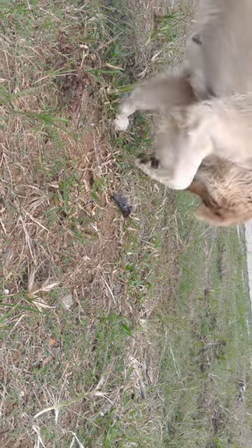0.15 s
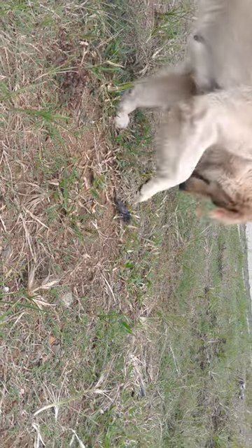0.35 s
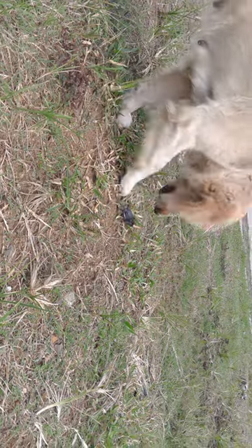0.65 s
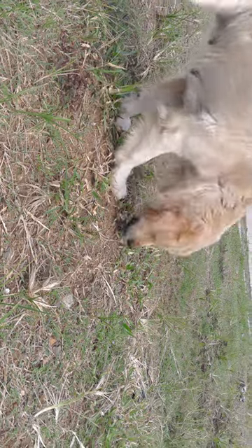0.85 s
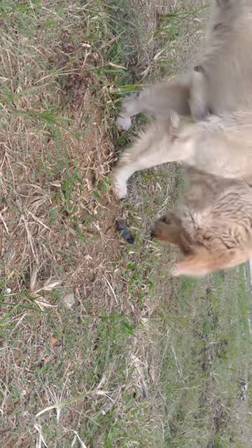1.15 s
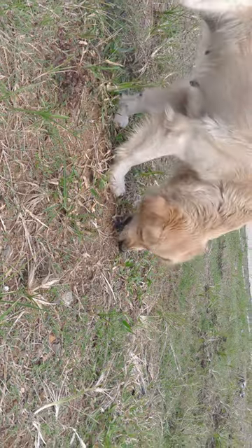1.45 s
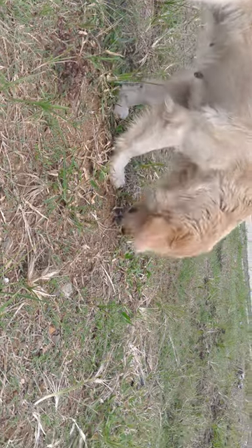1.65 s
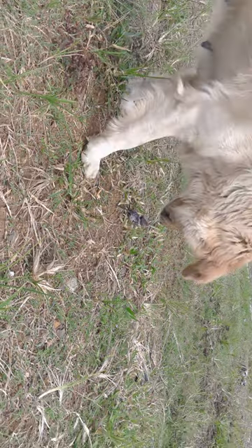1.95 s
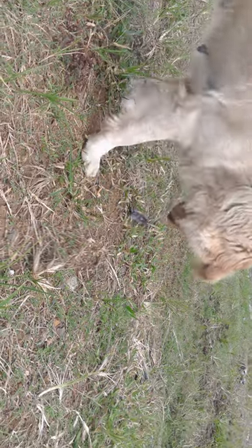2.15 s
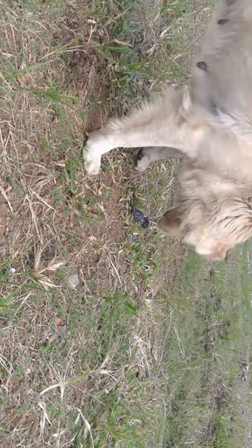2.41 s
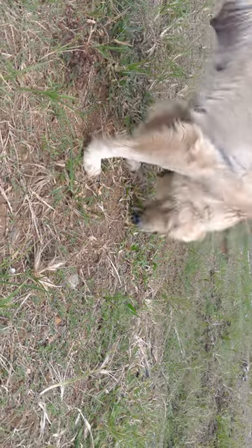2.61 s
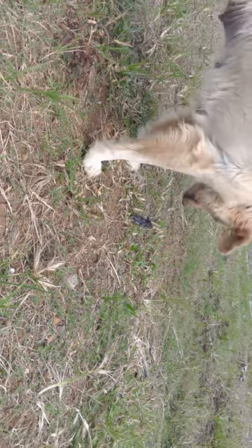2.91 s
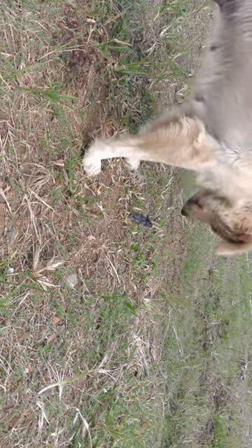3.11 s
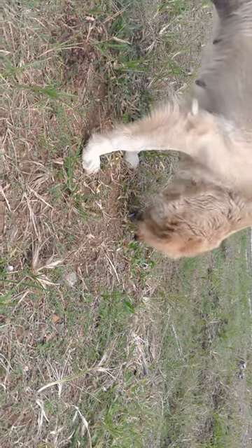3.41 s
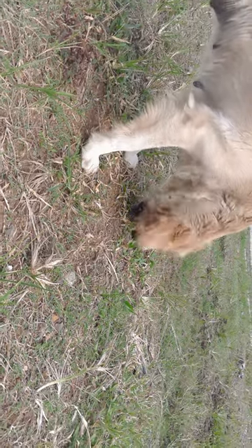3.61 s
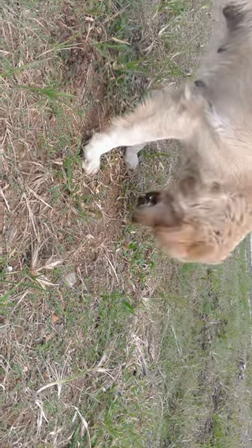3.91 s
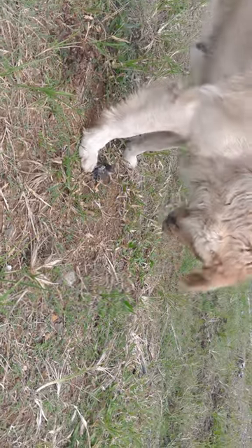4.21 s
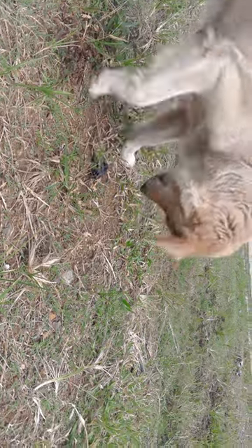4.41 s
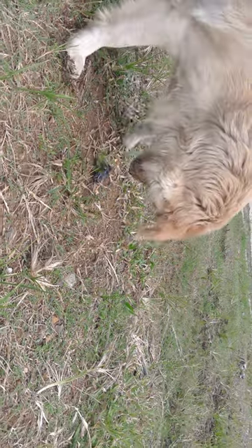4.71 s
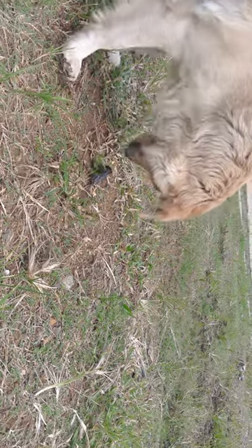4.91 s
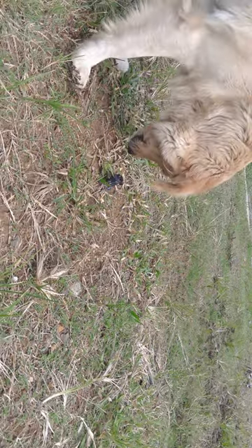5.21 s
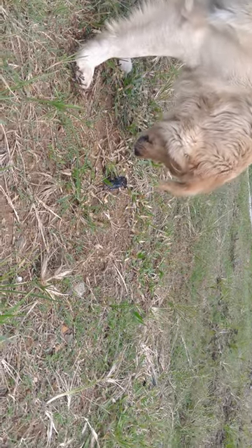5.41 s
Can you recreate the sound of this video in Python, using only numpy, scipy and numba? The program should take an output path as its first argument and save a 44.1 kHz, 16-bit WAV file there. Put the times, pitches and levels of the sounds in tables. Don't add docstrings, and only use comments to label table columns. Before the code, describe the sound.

Outdoors, a small animal gives short high squeaks amid rustling dry grass, four hard cracks early on, and faint wind rumble.

```python
import sys
import numpy as np
from scipy import signal
from scipy.fft import rfft, irfft
from scipy.io import wavfile
from scipy.ndimage import uniform_filter1d
from numba import njit

SR = 44100
rng = np.random.default_rng(int(sys.argv[2]) if len(sys.argv) > 2 else 0)


def to_linear_factor(level_db):
    exponent = np.asarray(level_db, float) / 20
    return 10 ** exponent


def to_wav(s):
    ch = np.atleast_2d(s).T
    pcm = np.round(np.clip(ch, -1, 1) * 32767)
    wavfile.write(sys.argv[1], SR, pcm.astype(np.int16))


N = 244749
T = np.arange(N) / SR


def level(x, db):
    return x * to_linear_factor(db) / np.sqrt(np.mean(x ** 2))


def colour(points, lo=0, hi=SR):
    hz = np.fft.rfftfreq(N, 1 / SR) + 1e-3
    f, db = np.transpose(points)
    gain = to_linear_factor(np.interp(np.log(hz), np.log(f), db)) * (hz > lo) * (hz < hi)
    return level(irfft(rfft(rng.standard_normal(N)) * gain, N), 0)


def walk(rate):
    k = int(SR / rate)
    steps = np.repeat(rng.standard_normal(N // k + 1), k)
    return 1.8 * uniform_filter1d(uniform_filter1d(steps, k), k)[:N]


@njit
def svf(x, hz, width):
    y, b, l = np.empty(len(x)), 0., 0.
    for i in range(len(x)):
        g, k = np.tan(np.pi * hz[i] / SR), width / hz[i]
        v = (b + g * (x[i] - l)) / (1 + g * (g + k))
        b, l, y[i] = 2 * v - b, l + 2 * g * v, k * v
    return y


def still_band(x, hz, width):
    return svf(x, np.full(len(x), float(hz)), float(width))


def taper(x, edge_hz, stop_hz):
    fade = np.clip((stop_hz - np.fft.rfftfreq(N, 1 / SR)) / (stop_hz - edge_hz), 0, 1)
    return irfft(rfft(x) * np.sin(fade * np.pi / 2) ** 4, N)


def arch(start, end):
    return np.sqrt(np.sin(np.pi * np.clip((T - start) / (end - start), 0, 1)) + 1e-12)


def rings(events, grit, rise_s, spread=1.5):
    out, t = np.zeros(N), T[:2000]
    for s, db, hz, t60 in events:
        i = int(s * SR)
        scratch = still_band(rng.standard_normal(len(t)), hz, spread * hz)
        tone = np.sin(2 * np.pi * hz * t) + grit * level(scratch, 0)
        tone = tone / np.sqrt(1 + grit ** 2)
        decay = np.exp(-np.log(1000) * t / t60)
        out[i:i + len(t)] += to_linear_factor(db) * tone * decay * (1 - np.exp(-t / rise_s))
    return out


def grass():
    # (peak time [s], level [dB], time to rise 20 dB [s], to fall 20 dB [s])
    swishes = [(0, -53, .01, .2), (.06, -59, .05, .05), (.09, -62, .05, .3), (.17, -56, .12, .3),
               (.24, -51, .09, .15), (.30, -50, .15, .015), (.33, -60, .03, .13), (.468, -64, .09, .2),
               (.77, -67, .24, .1), (.826, -63, .006, .08), (.944, -50, .05, .016), (.97, -64, .05, .25),
               (1.1, -63, .15, .12), (1.335, -61, .2, .015), (1.41, -63, .06, .04), (1.828, -50, .025, .15),
               (1.876, -51, .15, .012), (1.91, -57, .2, .3), (1.995, -56, .12, .12),
               (2.046, -52, .015, .03), (2.09, -54, .12, .04), (2.15, -48, .035, .08),
               (2.18, -56, .05, .03), (2.2, -62, .05, .3), (2.494, -63, .1, .3), (2.6, -63, .2, .1),
               (3.58, -68, .5, .2), (2.722, -49, .022, .025), (2.87, -60, .5, .2), (2.98, -63, .3, .08),
               (3.12, -67, .1, .09), (3.19, -71, .02, .9), (3.72, -70, .15, .08), (3.81, -68, .2, .9),
               (4.08, -64, .04, .05), (4.13, -61, .03, .3), (4.345, -61, .09, .05), (4.45, -68, .5, .5),
               (4.605, -57, .07, .05), (4.72, -63, .15, .23), (4.91, -58, .07, .12), (4.99, -62, .2, .1),
               (5.07, -56, .015, .15), (5.12, -59, .1, .12), (5.19, -61.5, .08, .5), (5.28, -62.5, .5, .3),
               (5.395, -58, .15, .12), (5.47, -64, .1, .3)]
    # (time [s], peak level [dB], ring frequency [Hz], t60 [s])
    low_ticks = [(0.1, -44, 1150, 0.013), (0.275, -48.5, 1510, 0.019), (0.909, -43, 676, 0.018),
                 (1.042, -39, 1350, 0.02), (1.042, -46, 3400, 0.007), (1.042, -47, 6000, 0.007),
                 (0.909, -48, 1300, 0.012), (0.909, -50, 3800, 0.008), (4.0886, -52, 2000, 0.012),
                 (1.0205, -30, 7250, 0.013), (2.72, -48, 2300, 0.012), (2.72, -50, 3400, 0.01),
                 (1.2245, -52, 7100, 0.01), (1.3235, -38, 3300, 0.01), (1.3235, -42, 1500, 0.01),
                 (1.3237, -42, 7000, 0.01), (1.328, -39, 1600, 0.012), (1.328, -41, 3600, 0.008),
                 (1.328, -43, 7100, 0.008), (1.391, -48, 4500, 0.012), (2.1, -32, 1250, 0.007),
                 (2.1003, -40, 2600, 0.005), (2.1003, -41, 4000, 0.005), (2.149, -50, 1020, 0.022),
                 (2.175, -38, 1200, 0.009), (2.846, -50.5, 1420, 0.018), (4.122, -50, 766, 0.014),
                 (4.259, -41, 600, 0.013), (4.914, -48.5, 680, 0.012)]
    # (time [s], peak level [dB], ring frequency [Hz])
    high_ticks = [(0.3042, -31, 5850), (0.3541, -45, 6020), (0.4399, -48, 5670), (0.4824, -47, 4620),
                  (0.4554, -50, 4300), (0.4705, -47, 5500), (0.714, -54, 6500), (0.8255, -48, 5000),
                  (0.828, -47, 6200), (0.838, -48, 6300), (0.848, -50, 5200), (0.911, -48, 6400),
                  (1.0211, -36, 6900), (0.8265, -46, 5900), (0.23, -42, 5900), (0.248, -44, 6900),
                  (0.275, -44, 7100), (1.873, -40, 5200), (4.699, -50, 5500), (5.013, -50, 5500),
                  (5.13, -47, 6900), (5.18, -48, 5000), (5.346, -47, 6800), (3.991, -54, 4850),
                  (1.8334, -40, 5810), (1.8594, -41, 5330), (2.0428, -38, 6380), (2.05, -41, 5600),
                  (2.0762, -43, 5380), (2.089, -42, 5400), (2.1475, -37, 5000), (2.153, -40, 5500),
                  (2.16, -41, 4900), (1.9724, -47, 5810), (1.9854, -43, 6600), (2.395, -50, 6000),
                  (2.507, -47, 7100), (2.704, -49, 4600), (2.7182, -40, 5100), (2.722, -40, 7000),
                  (2.731, -44, 5000), (2.7526, -50, 4530), (2.7666, -47, 5310), (2.8554, -44, 4020),
                  (3.1293, -47, 6580), (4.0672, -42, 4610), (4.079, -49, 5000), (4.0886, -40, 4940),
                  (4.135, -50, 5000), (4.197, -50, 5000), (4.2125, -47, 7300), (4.12, -42, 4740),
                  (4.1649, -44, 4250), (4.2582, -48, 4850), (4.348, -44, 4760), (4.5994, -45, 5540),
                  (5.0674, -44, 5110), (5.1018, -42, 5820)]
    grains_per_s, grain_spread_db, grain_top = 1500, 2.5, 2.2
    width_hz = 2800.

    slopes = [peak_db - 20 * np.where(T < s, (s - T) / rise_s, (T - s) / fall_s)
              for s, peak_db, rise_s, fall_s in swishes]
    db = np.max(slopes, axis=0)
    strength_db = grain_spread_db * np.minimum(rng.exponential(size=N), grain_top)
    clicks = (rng.random(N) < grains_per_s / SR) * rng.standard_normal(N) * to_linear_factor(strength_db)
    clicks = level(clicks, 0) + rng.standard_normal(N)

    centre = 5250 + 15 * (db + 65) + 200 * walk(12)
    blades = svf(svf(clicks, centre, width_hz), centre, 1.7 * width_hz)
    blades = level(blades - .25 * still_band(blades, 6250, 700), 0)
    tips = level(still_band(clicks, 6850, 550), -11)
    blades = blades + to_linear_factor(1.5 * walk(20)) * tips
    body = level(still_band(clicks, 1700, 1500), -10)
    swish = to_linear_factor(db + .6 * walk(45) + 1.6 * walk(160))

    bright = [(s, peak_db - 1.5, hz, .011) for s, peak_db, hz in high_ticks]
    out = swish * (level(blades, .86) + body)
    out += rings(low_ticks, grit=.43, rise_s=.00028)
    return out + rings(bright, grit=.7, rise_s=.0003, spread=.55)


def wind():
    # (frequency [Hz], level [dB per Hz])
    air = [(12, -32), (20, -3.5), (108, -5.5), (161, -4.5), (212, -11), (385, -15), (436, -22.5),
           (588, -28), (792, -29), (1020, -32.5), (1090, -33.5), (2680, -36), (3350, -36.5), (4620, -39.5),
           (7600, -45), (9880, -73.5), (16700, -120)]
    # (time [s], strength [dB], share of slow buffeting [dB])
    gusts = [(0.0, -49, -6), (0.11, -45, -4), (0.17, -49, -2), (0.28, -45, -3), (1.16, -49, -4),
             (1.3, -46, -7), (1.31, -53, -8), (1.36, -47, -3), (1.74, -48, -2), (2.07, -51, -5),
             (2.3, -47, -1), (2.64, -50, -5), (4.85, -50, -3), (5.02, -51, -3), (5.07, -48, -11),
             (5.12, -52, -4), (5.55, -50, -2)]
    # (frequency [Hz], width [Hz], level [dB])
    machines = [(158.5, 3.4, 10), (300, 16, 1), (398, 29, 6.5), (533, 40, 2), (645, 45, -1), (784, 60, -4),
                (2000, 90, -11)]

    s, gust_db, share_db = np.transpose(gusts)
    buffet_db = gust_db + share_db - .3
    rest = np.clip(1 - to_linear_factor(2 * share_db), .15, 1)
    rumble_db = gust_db + 10 * np.log10(rest) - .5
    out = to_linear_factor(np.interp(T, s, buffet_db)) * colour(air, hi=90)
    out += to_linear_factor(np.interp(T, s, rumble_db)) * colour(air, lo=90, hi=300)

    field = colour(air, lo=300)
    bands = 0
    for hz in 330 * 2 ** np.arange(0, 4.8, .5):
        flicker = to_linear_factor(.48 * walk(4.1) + 1.6 * walk(16))
        bands = bands + flicker * still_band(field, hz, .45 * hz)
    bands = level(bands, -60.5)
    low = taper(bands, 800, 1500)
    high = bands - low

    drone = 0
    for hz, width, db in machines:
        centre = hz * (1 + .012 * walk(3))
        tone = svf(rng.standard_normal(N), centre, float(width))
        drone = drone + level(tone, db) * to_linear_factor(2.1 * walk(4))
    drone_db = -66.5 - .85 * T + .3 * walk(2.5)
    low_share = low * to_linear_factor(-np.mean(drone_db))
    return out + high + to_linear_factor(drone_db) * (low_share + to_linear_factor(-9) * drone)


def hums():
    # (start [s], end [s], frequency [Hz], level [dB])
    engines = [(0, 1.75, 158.5, -54), (0, .6, 50, -53), (2.05, 2.65, 64, -55), (-.2, .3, 540, -68),
               (.45, .62, 770, -70), (2.1, 2.8, 400, -70), (2.2, 2.8, 295, -64), (3.4, 3.75, 790, -73),
               (3.15, 3.5, 470, -69), (4.68, 4.85, 710, -73), (4.55, 5.0, 480, -72)]
    out = 0
    for start, end, hz, db in engines:
        size = np.sqrt(2) * arch(start, end) * to_linear_factor(db + 2 * walk(9))
        pitch = hz * (1 + .018 * walk(13))
        out = out + size * np.sin(2 * np.pi * np.cumsum(pitch) / SR)
    return out


def phrased(notes):
    join_s, attack_s, attack_db, release_s, release_db = .005, .0035, -10, .007, -19
    notes, tables = sorted(notes), []
    for k, (start, end, hz0, hz1, db) in enumerate(notes):
        rows = [(start, hz0, db), (end, hz1, db)]
        if k == 0 or start - notes[k - 1][1] > join_s:
            rows.insert(0, (start - attack_s, hz0, db + attack_db))
        if k == len(notes) - 1 or notes[k + 1][0] - end > join_s:
            rows.append((end + release_s, hz1, db + release_db))
        tables.append(rows)
    return tables


def hops():
    # (start [s], end [s], start pitch [Hz], end pitch [Hz], level [dB])
    second_tones = [(1.131, 1.136, 4880, 4980, -49), (1.138, 1.143, 5300, 5380, -56),
                    (1.145, 1.155, 5000, 4880, -47), (1.157, 1.167, 5250, 5370, -50),
                    (1.169, 1.174, 4950, 4880, -51), (1.176, 1.184, 4950, 5050, -54),
                    (1.187, 1.194, 5400, 5450, -59), (1.196, 1.198, 5000, 4950, -51),
                    (1.212, 1.214, 5000, 4900, -54), (1.22, 1.231, 4900, 5100, -61),
                    (1.655, 1.66, 5050, 4950, -57), (1.684, 1.695, 5380, 5320, -53),
                    (1.697, 1.701, 5200, 5100, -55), (1.704, 1.713, 5380, 5400, -54),
                    (1.716, 1.722, 5100, 5000, -55), (1.727, 1.736, 5100, 5480, -54),
                    (2.887, 2.889, 6400, 5200, -54), (2.893, 2.9, 5050, 4800, -47),
                    (2.902, 2.905, 4760, 4760, -53), (2.913, 2.92, 4980, 5050, -47),
                    (2.9205, 2.9215, 5200, 5700, -54), (2.929, 2.931, 5300, 5300, -59),
                    (2.948, 2.953, 6100, 6300, -51), (3.792, 3.82, 5270, 5300, -68),
                    (3.823, 3.845, 5330, 5400, -68), (3.858, 3.863, 5300, 5300, -69),
                    (3.886, 3.935, 4940, 4980, -69)]
    return [[(start, hz0, db), (end, hz1, db)] for start, end, hz0, hz1, db in second_tones]


def track(tables, waver_hz, flutter_db):
    s, hz, db = np.transpose(np.concatenate(sorted(tables)))
    s = np.maximum.accumulate(s)
    on = np.zeros(N)
    for rows in tables:
        on[max(int(rows[0][0] * SR), 0):int((rows[-1][0] + .0018) * SR)] = 1
    size = uniform_filter1d(on * to_linear_factor(np.interp(T, s, db) + flutter_db * walk(150)), size=60)
    pitch = np.interp(T, s, hz) + waver_hz * walk(200)
    held = int(SR / 75)
    pitch = pitch + 8 * np.repeat(rng.standard_normal(N // held + 1), held)[:N]
    return pitch, 2 * np.pi * np.cumsum(pitch) / SR, np.sqrt(2) * size


def rodent():
    # (start [s], end [s], start pitch [Hz], end pitch [Hz], level
    # [dB])
    squeaks = [(1.1295, 1.1315, 4530, 4470, -37), (1.132, 1.154, 4270, 4270, -40),
               (1.155, 1.168, 4190, 4290, -40), (1.169, 1.197, 4180, 4400, -39.5),
               (1.198, 1.212, 4450, 4620, -39.5), (1.214, 1.226, 4370, 4360, -44),
               (1.226, 1.232, 4320, 4550, -45), (1.233, 1.25, 4700, 4560, -43),
               (1.25, 1.269, 4550, 4550, -45), (1.632, 1.645, 4380, 4240, -38),
               (1.645, 1.66, 4240, 4320, -38), (1.661, 1.676, 4390, 4470, -39),
               (1.677, 1.69, 4280, 4310, -40), (1.691, 1.7, 4230, 4350, -39),
               (1.7, 1.717, 4330, 4340, -39.5), (1.718, 1.733, 4270, 4380, -40),
               (1.734, 1.747, 4440, 4630, -38), (1.747, 1.754, 4630, 4530, -40),
               (1.754, 1.769, 4530, 4600, -46), (2.262, 2.329, 4410, 4410, -49.5),
               (2.329, 2.372, 4420, 4275, -51), (2.881, 2.892, 4010, 4040, -46),
               (2.893, 2.899, 3500, 3230, -57), (2.899, 2.908, 3230, 3350, -57),
               (2.908, 2.921, 3350, 3600, -64), (2.922, 2.939, 4280, 4420, -43.5),
               (2.94, 2.947, 4330, 4280, -44), (2.948, 2.952, 4140, 4200, -44),
               (2.952, 2.956, 4250, 4560, -45), (2.956, 2.966, 4560, 4490, -43.5),
               (0.0, 0.003, 3650, 3550, -54), (1.795, 1.806, 4560, 4500, -59), (1.807, 1.82, 4330, 4150, -57),
             (1.885, 1.898, 4420, 4560, -54), (3.768, 3.79, 3820, 3880, -66),
             (3.79, 3.812, 3900, 3950, -73), (3.824, 3.834, 3960, 4000, -64),
             (3.854, 3.866, 3950, 4000, -72), (3.88, 3.897, 3900, 3780, -69),
             (3.897, 3.912, 3850, 4050, -70), (3.926, 3.935, 3900, 4000, -67),
             (4.217, 4.234, 3840, 4060, -51), (4.907, 4.934, 3712, 3690, -50),
             (4.935, 4.943, 3618, 3400, -57), (5.46, 5.49, 3720, 3450, -70.5),
             (5.49, 5.525, 3450, 3200, -70.5)]
    pitch, phase, size = track(phrased(squeaks), waver_hz=16, flutter_db=1.1)
    upper_pitch, upper_phase, upper = track(hops(), waver_hz=42, flutter_db=1.8)
    main = size * (np.sin(phase) + to_linear_factor(-10) * np.sin(2 * phase))
    mirror = to_linear_factor(-21) * (upper_pitch < 5700) * np.sin(2 * phase - upper_phase)

    middle = .35 * pitch + .65 * upper_pitch
    rasp_width_hz = 1300.
    rasp = svf(svf(rng.standard_normal(N), middle, rasp_width_hz), middle, rasp_width_hz)
    hoarse = uniform_filter1d(upper * np.clip(upper / (size + 1e-9), .55, 1.25), size=300)
    return main + upper * (np.sin(upper_phase) + mirror) + hoarse * level(rasp, -7)


def breaks():
    # (start [s], end [s], centre [Hz], width [Hz], level [dB])
    break_ups = [(1.127, 1.2, 5000, 1300, -60), (1.195, 1.236, 4800, 1800, -60),
                 (1.65, 1.745, 5100, 1100, -61), (2.898, 2.925, 5100, 2200, -51),
                 (2.903, 2.92, 3950, 500, -60), (1.06, 1.12, 5300, 250, -68), (1.07, 1.12, 4400, 400, -68),
                 (2.94, 2.956, 5500, 1800, -60), (2.966, 2.976, 5100, 1500, -59),
                 (3.79, 3.945, 4100, 2800, -69), (2.46, 2.53, 5200, 900, -63), (2.47, 2.54, 3200, 900, -66)]
    breath = rng.standard_normal(N) * to_linear_factor(2 * walk(250))
    out = 0
    for start, end, hz, width, db in break_ups:
        rasp = still_band(still_band(breath, hz, width), hz, width)
        out = out + arch(start, end) * level(rasp, db)
    return out


def struck(stalk, cracks):
    events = []
    for s, db, others_db, longer in cracks:
        for k, (hz, ring_db, t60) in enumerate(stalk):
            lag_s, extra_db = (.0001, others_db) if k > 0 else (0, 0)
            events.append((s + lag_s, db + ring_db + extra_db, hz, t60 * longer))
    return events


def snaps():
    # (time [s], splinter level [dB], splinter t60 [s], thump level [dB], thump frequency [Hz])
    stalk_snaps = [
        (1.3438, -21, .036, -25, 470),
        (1.4957, -25, .036, -27, 520),
        (1.6249, -24, .036, -21, 545),
        (1.7705, -21, .03, -24, 555),
    ]
    # (frequency [Hz], level [dB per Hz])
    splinter = [(180, -42), (300, -16.5), (648, -16.5), (1030, -23), (2720, -6), (4310, -5), (5490, -2.5),
                (6370, -4), (7600, -0.5), (9880, -34), (16700, -120)]
    # (frequency [Hz], level [dB], t60 [s])
    thin_stalk = [(3860, 0, .0085), (6900, -3, .011), (1500, -22, .016), (5850, -9, .007),
                  (2000, -13, .009)]
    # (frequency [Hz], level [dB], t60 [s])
    thick_stalk = [(2680, 0, .0028), (4400, -7, .0028), (5450, -11, .004), (7200, -14, .003)]
    # (time [s], peak level [dB], other rings [dB], ring length [multiple])
    thin_cracks = [
        (1.3438, -6.5, 0, 1.01),
        (1.34582, -17, 2, .8),
        (1.3478, -24, 3, .8),
    ]
    # (time [s], peak level [dB], other rings [dB], ring length [multiple])
    thick_cracks = [
        (1.4958, 1, -1, .85),
        (1.498, -17, 5, 1.5),
        (1.625, -2, -1, 1.15),
        (1.6283, -14, 4, 2.1),
        (1.7705, 0, 0, .9),
        (1.7713, -12, 2, 1.7),
        (1.77237, -3, 2, 1.6),
        (1.7737, -16, 3, 1.2),
        (1.775, -6, 4, .9),
    ]
    # (time [s], peak level [dB], ring frequency [Hz], t60 [s])
    loose_fibres = [(1.3518, -27, 2750, .022), (1.355, -36, 7000, .015), (1.3595, -39, 3100, .03),
                    (1.344, -18, 4650, .013), (1.3464, -24, 3860, .018), (1.348, -26, 2100, .008),
                    (1.349, -30, 5900, .012), (1.3442, -21, 5920, .014), (1.7712, -19, 2420, .012),
                    (1.4962, -24, 1530, .014), (1.4962, -30, 1150, .012), (1.4965, -22, 2060, .01),
                    (1.497, -26, 6040, .01), (1.5035, -33, 4600, .01), (1.508, -38, 7000, .015),
                    (1.511, -38, 2900, .025), (1.6252, -24, 1250, .012), (1.6252, -28, 1650, .01),
                    (1.6255, -30, 850, .012), (1.4962, -33, 800, .012), (1.7715, -20, 3800, .01),
                    (1.7725, -23, 3180, .014), (1.7725, -27, 4750, .01), (1.6275, -22, 5950, .01),
                    (1.6288, -15, 2750, .009), (1.635, -34, 7200, .01), (1.638, -36, 3200, .02),
                    (1.7715, -21, 7420, .016), (1.7728, -17, 5420, .016), (1.7815, -32, 3000, .01),
                    (1.7825, -35, 5500, .008), (1.4978, -21, 7380, .014), (1.3438, -19, 1520, .017),
                    (1.344, -30, 780, .012), (1.3445, -21, 3230, .014), (1.3475, -30, 2400, .01),
                    (1.771, -26, 1460, .014), (1.5005, -22, 2500, .012), (1.505, -33, 2750, .02),
                    (1.632, -25, 2800, .022), (1.632, -28, 6900, .006), (1.777, -22, 5400, .006),
                    (1.7775, -27, 1500, .012), (1.778, -27, 3800, .008), (1.7815, -30, 6900, .02),
                    (1.7845, -30, 3200, .018)]
    crack_rise_s = .0002

    cracks = struck(thin_stalk, thin_cracks) + struck(thick_stalk, thick_cracks) + loose_fibres
    out = -rings(cracks, grit=.08, rise_s=crack_rise_s)
    splintering = colour(splinter) * to_linear_factor(2.5 * walk(900))
    thumps = []
    for s, db, t60, thump_db, thump_hz in stalk_snaps:
        after = np.maximum(T - s, 0)
        rise = np.minimum(after / .002, 1) ** 2
        out += to_linear_factor(db) * rise * np.exp(-np.log(1000) * after / t60) * splintering
        thumps.append((s, thump_db, thump_hz, .018))
        thumps.append((s, thump_db - 4, thump_hz * 1.4, .018))
    return out - rings(thumps, grit=.1, rise_s=3 * crack_rise_s)


def scene():
    return (grass() + wind() + hums() + rodent() + breaks() + snaps())[None]


def band_limit(x):
    return signal.sosfilt(signal.butter(12, 8940, fs=SR, output="sos"), x)


def record(dry):
    phone_sr = 16000
    kept = taper(dry, edge_hz=7230, stop_hz=8080)
    image = taper(kept * 2 * np.cos(2 * np.pi * phone_sr * T), edge_hz=8430, stop_hz=9300)
    hiss = to_linear_factor(-104) * rng.standard_normal(N)
    return band_limit(kept + to_linear_factor(-18) * image + hiss)


dry = scene()
out = record(dry)
to_wav(out)
```